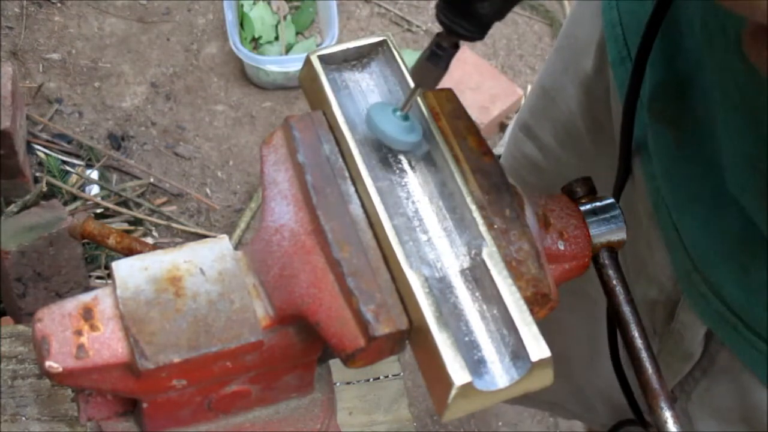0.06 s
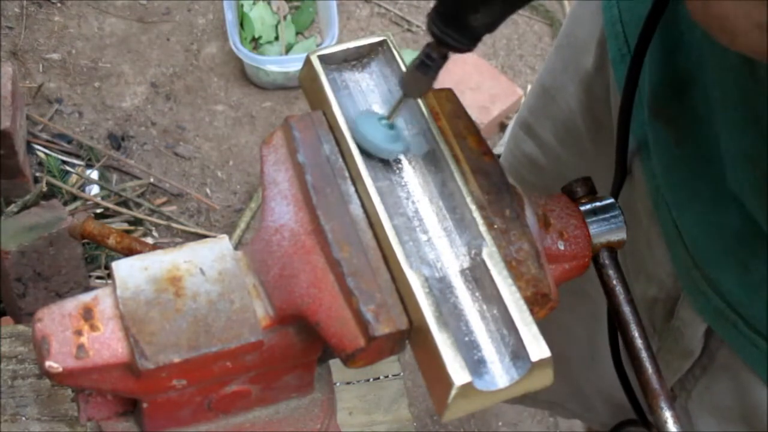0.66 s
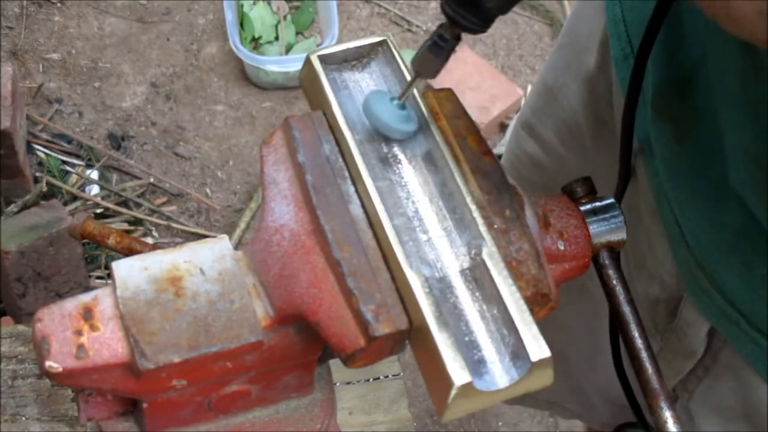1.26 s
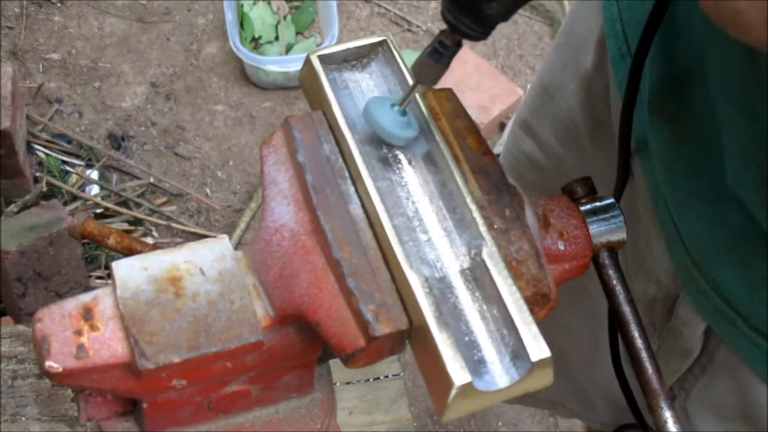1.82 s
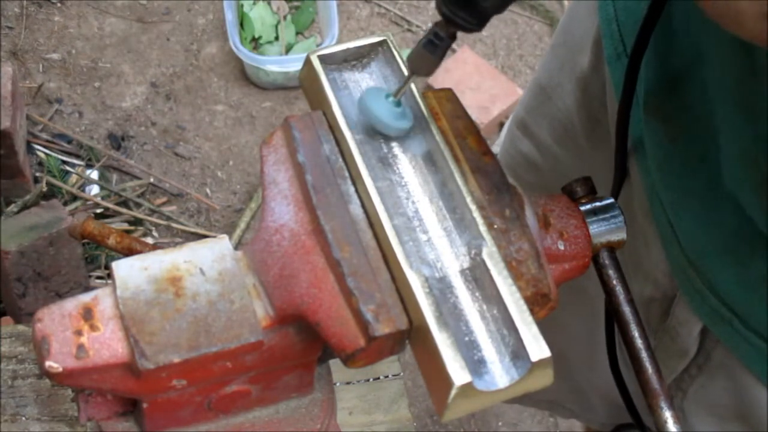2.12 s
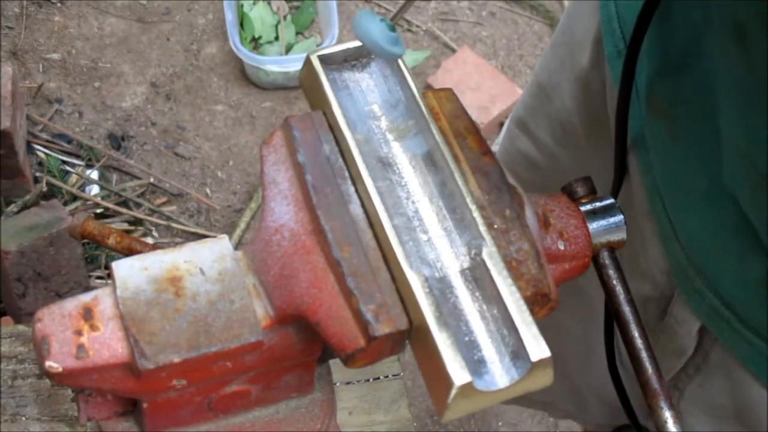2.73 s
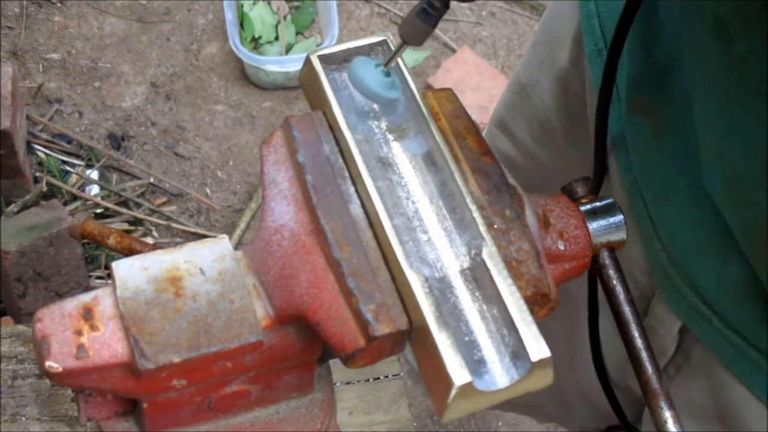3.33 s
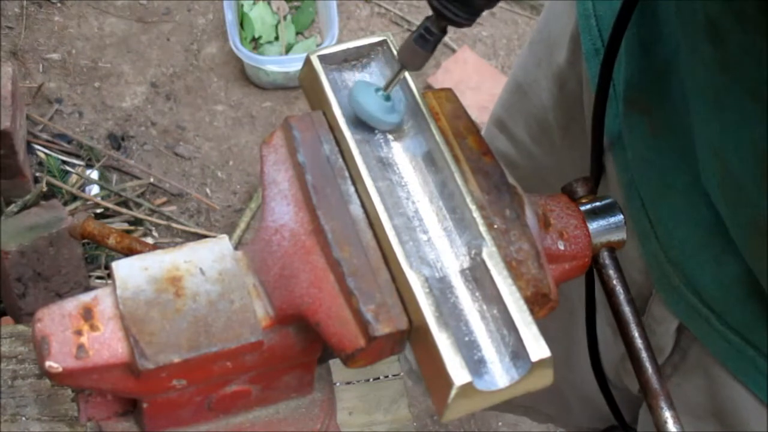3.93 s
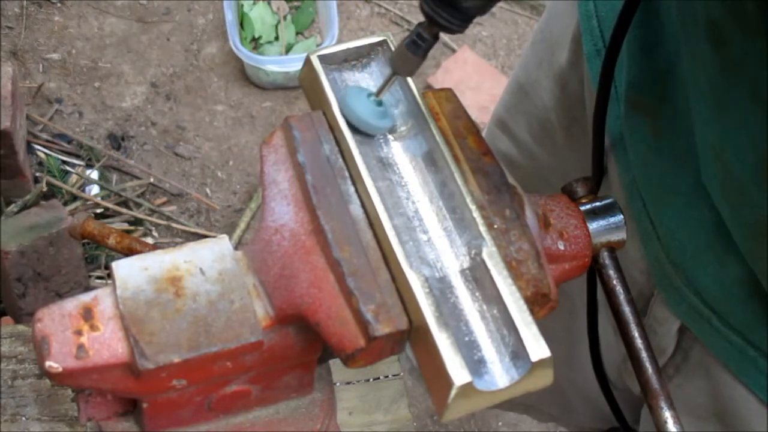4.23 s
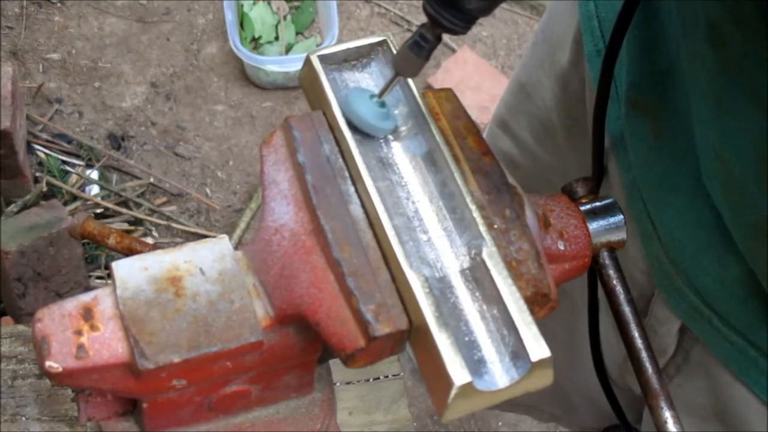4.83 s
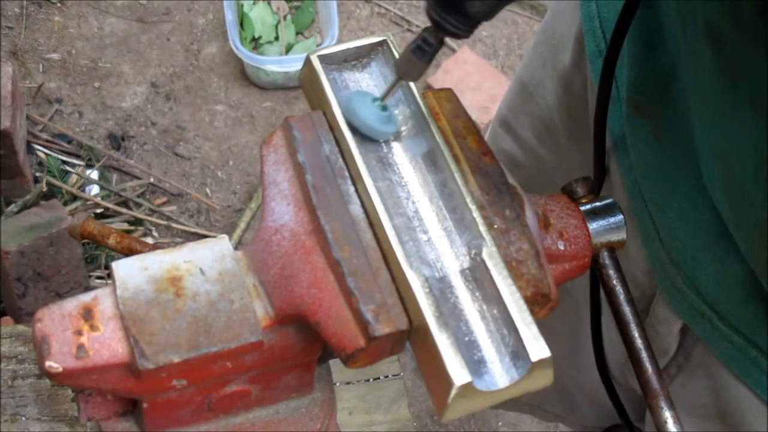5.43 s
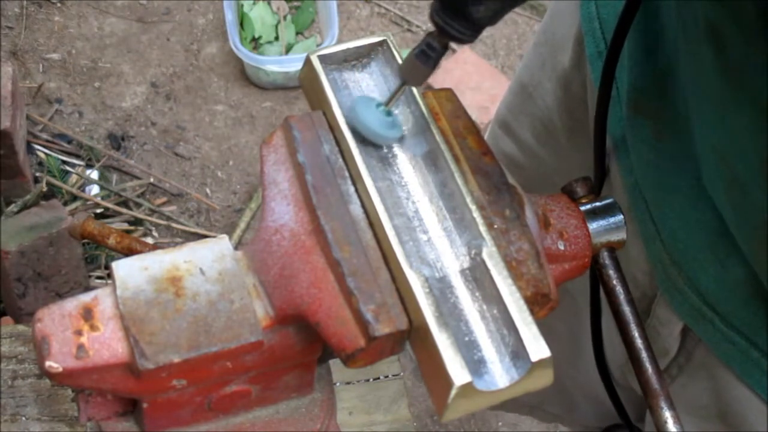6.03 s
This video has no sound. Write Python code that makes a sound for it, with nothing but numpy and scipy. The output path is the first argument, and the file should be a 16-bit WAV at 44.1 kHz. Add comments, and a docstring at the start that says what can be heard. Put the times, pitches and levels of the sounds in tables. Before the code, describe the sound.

A handheld rotary tool runs throughout, close by and outdoors, with a high motor whine and the hiss of its cooling air. After a brief scrape at the very start, its small abrasive wheel bites into a metal casting held in a vise at about 0.5 seconds. It rasps and chatters in short strokes, with a thin sizzle, a metallic ring and sharp snags, while the pitch of the motor sags slightly. At about 2.2 seconds the wheel lifts and the tool runs free, its whine climbing and its hiss growing louder toward 4 seconds. A sharp catch at 3.8 seconds begins the second spell of grinding. From about 4.1 seconds the strokes are harder, dotted with clicks and brief shrill squeals as the wheel skids. The motor drops steadily in pitch under the load, and the grinding continues to the end at about 6 seconds.

```python
"""Outdoors, a handheld rotary tool works a small abrasive wheel over a metal casting clamped in a vise.
Its fan and brushes hiss, and magnetic forces, pulsed at twice the mains frequency, make its housing whine.
The shaft slows under load and recovers when the wheel is lifted. The wheel chatters on the metal:
friction excites the casting's modes, so it rasps and rings, with squealing skids and sharp snags."""
import sys
import numpy as np
from scipy import signal
from scipy.fft import rfft, irfft, next_fast_len
from scipy.io import wavfile
from scipy.ndimage import uniform_filter1d, map_coordinates

SR = 44100
rng = np.random.default_rng(int(sys.argv[2]) if len(sys.argv) > 2 else 0)


def transcribe(signal):
    """Save signal, clipped to [-1, 1], as a 16-bit WAV file at the path in sys.argv[1]."""
    frames = np.atleast_2d(signal).T
    limited = np.clip(frames, -1, 1)
    pcm = np.round(limited * 32767).astype(np.int16)
    wavfile.write(sys.argv[1], SR, pcm)


N = 267687
TIME = np.arange(N) / SR
SPURT_HZ = 119.95  # one spurt of current per mains half-wave
PRESS_S, EASE_S = 0.011, 0.016  # rise and decay of the hand's pressure


def amp(db):
    """Amplitude ratio of a level in decibels."""
    return 10 ** (np.asarray(db) / 20)

def unit(x):
    """Normalisation to rms 1."""
    return x / np.sqrt(np.mean(x ** 2) + 1e-20)

def even(x, size):
    """Normalisation by the running rms over about size samples."""
    power = uniform_filter1d(uniform_filter1d(x ** 2, size), size // 2)
    return x / np.sqrt(np.abs(power) + 1e-12)

def curve(rows):
    """Linear interpolation of (time, value) rows at every sample."""
    return np.interp(TIME, *np.transpose(rows))

def wobble(rate):
    """Smooth random modulation: a spline through rate knots a second."""
    return map_coordinates(rng.standard_normal(int(N * rate / SR) + 4), [TIME * rate])

def swell(start, length, rise, decay, lean_db=0):
    """Envelope: linear attack, a hold that climbs by lean_db, exponential release."""
    age = TIME - start
    hold = amp(lean_db * (np.clip(age / length, 0, 1) + 0.5))
    return np.clip(age / rise, 0, 1) * hold * np.exp(-np.maximum(age - length, 0) / decay)

def body(spectrum, modes=(), size=4096):
    """Minimum-phase impulse response of energy 1: resonance peaks on a broad spectrum."""
    hz = np.fft.rfftfreq(size, 1 / SR)
    knots_hz, level = np.transpose(spectrum)
    broad_db = np.interp(np.log(hz + 1), np.log(knots_hz), level)
    peaks_db = sum(lift / (1 + (2 * (hz - centre) / width) ** 2) for centre, width, lift in modes)
    cepstrum = irfft(np.log(amp(broad_db + peaks_db)))
    cepstrum[1:size // 2] *= 2  # folding makes the response causal
    cepstrum[size // 2 + 1:] = 0
    response = irfft(np.exp(rfft(cepstrum)))
    return response / np.linalg.norm(response)

def through(x, response):
    """Linear filtering: convolution with an impulse response."""
    return signal.fftconvolve(x, response)[:N]


def current(firing=0.5, duty=0.37, rise=0.14):
    """Phase control: the current fires late in each mains half-wave, then falls to zero."""
    age = (TIME * SPURT_HZ - firing) % 1
    return np.clip(age / rise, 0, 1) * np.clip(1 - age / duty, 0, 1)


def eddies(size=512, patchy_db=2.1):
    """Turbulence: noise of rms 1 in which narrow bands swell and fade."""
    spectra = signal.stft(rng.standard_normal(N), nperseg=size)[2]
    patches = uniform_filter1d(rng.standard_normal(spectra.shape), size=4, axis=0)
    patches = uniform_filter1d(patches, size=30, axis=1)
    return unit(signal.istft(spectra * amp(patchy_db * unit(patches)), nperseg=size)[1][:N])


# Cooling air, loudest when the tool runs free: (time [s], level [dB])
AIR_LEVEL = [(0, -33), (.6, -31.5), (.78, -34.5), (1.5, -34.5), (2.1, -31), (2.22, -32.5), (2.4, -30),
             (2.55, -31), (2.82, -28.5), (3.7, -25), (4.02, -25), (4.3, -31), (5.2, -32.5), (6.07, -33.5)]
def following(usual_db, slope, light_load_db=-32):
    """Power law: a level that moves slope dB for each dB of the cooling air."""
    return usual_db + slope * (curve(AIR_LEVEL) - light_load_db)


# Spectra of the vent hiss and the rumble: (frequency [Hz], level [dB])
VENT_SPECTRUM = [(30, -20), (200, -5.5), (400, -9.5), (600, -4), (1500, 3.5), (2200, 1), (2750, -3),
                 (3300, -4.5), (4200, 2), (6500, -0.5), (8200, 4), (10500, -2), (13000, -0.5), (15000, -6),
                 (15800, -22)]
RUMBLE_SPECTRUM = [(20, -69), (40, -34), (58, 0.5), (80, -19), (110, -6), (180, -25), (400, -27),
                   (2000, -79)]
# Resonances of vents and brushes: (frequency [Hz], bandwidth [Hz], lift [dB])
VENT_MODES = [(1025, 190, 7.4), (3730, 210, 5.1), (5990, 590, 4.2), (8760, 130, 3.4), (9380, 200, 4),
              (11000, 550, 4.6), (15400, 600, 3.6)]
BRUSH_PEAK = [(12600, 3400, 14)]
# Bands of brush hiss that stand out as the tool is turned:
# (time [s], duration [s], frequency [Hz], half-width [Hz], level [dB])
BRUSH_BANDS = [(2.331, .42, 15500, 705.5, -45), (2.718, .65, 9490, 450, -46), (2.92, 0.28, 11800, 551, -36),
               (3.172, .92, 13200, 748, -38), (3.548, 0.46, 8950, 399.5, -39)]
def fan_and_brushes(turns, swirl_db=3.0, flutter_db=1.23, spark_db=4, rumble_db=-24):
    """Amplitude-modulated noise: air pulses once a turn over a rumble, brushes once a current spurt."""
    swirl = amp(swirl_db * np.cos(2 * np.pi * turns) + flutter_db * wobble(70))
    hiss = through(swirl * eddies(), body(VENT_SPECTRUM, VENT_MODES))
    sparks = unit(amp(spark_db * current()))
    brush_noise = through(eddies(), body([(3000, -19), (11000, 0)], BRUSH_PEAK))
    brushes = amp(following(usual_db=-42.5, slope=1)) * brush_noise
    for start, length, hz, half_width, db in BRUSH_BANDS:
        band = through(rng.standard_normal(N), body([(10000, 0)], [(hz, 2 * half_width, 30)]))
        brushes += amp(db) * swell(start, length, rise=0.043, decay=0.043) * band
    rumble = through(rng.standard_normal(N), body(RUMBLE_SPECTRUM))
    return amp(curve(AIR_LEVEL)) * (hiss + amp(rumble_db) * rumble) + sparks * brushes


# Reflection off the vise, shifting as the hand moves the tool: (time [s], delay [ms])
VISE_DELAY = [(0, 0.42), (.7, 0.28), (1.3, 0.44), (2.15, 0.42), (2.35, 0.33), (2.9, 0.307), (3.1, 0.31),
              (6.07, 0.32)]
def reflected(x, share=0.27):
    """Comb filtering: the direct sound interferes with its delayed reflection."""
    lag = curve(VISE_DELAY) * SR / 1000
    return x + share * map_coordinates(x, [np.arange(N) - lag])


# Response of the housing: (frequency [Hz], level [dB])
HOUSING_SPECTRUM = [(1000, -53), (1500, -37.5), (1750, -5.5), (2000, -13.5), (2150, 2), (2300, 9.5),
                    (2440, 16.5), (2560, 9.5), (2800, -48), (4000, -54.5)]
# Its resonance: (frequency [Hz], bandwidth [Hz], lift [dB])
HOUSING_PEAK = [(1870, 125, 8)]
# Commutator whistle: (time [s], level [dB])
WHISTLE_LEVEL = [(0, -36), (.6, -36), (.7, -38), (1, -39.5), (1.6, -40), (1.8, -47), (2.15, -44),
                 (2.35, -36.5), (3.45, -34.5), (3.8, -40), (4.6, -44), (4.9, -54)]
# Tones of the unloaded shaft: (multiple of the shaft speed, level re the air [dB])
SHAFT_TONES = [(1, -16), (2, -30), (7, -32), (12, -18), (14, -26), (15, -44), (16, -15.5), (24, -15)]
# Buzz of the windings: (multiple of the spurt rate, level re the air [dB])
WINDING_TONES = [(1, -26.5), (3, -29.5), (4, -27.5), (5, -24.5), (6, -25), (7, -40)]
def motor(turns, speed, easy_hz=245, sag_hz=11, damped_db=-5, rough_db=1.3):
    """Forced vibration: eight slots pull on the housing; load damps the shaft tones and adds strain."""
    load = np.clip((easy_hz - speed) / sag_hz, 0, 1)
    angle = 2 * np.pi * turns
    field = current() + 0.081 + 0.015 * load  # a little pull remains between spurts
    pull = np.sin(8 * angle) * field * amp(rough_db * wobble(120))
    housing = even(through(pull, body(HOUSING_SPECTRUM, HOUSING_PEAK)), size=2940) / np.sqrt(2)
    whine = amp(following(usual_db=-28, slope=1.56)) * housing
    strain = load * amp(-44 + 2.7 * wobble(33)) * np.sin(16 * angle)
    whistle = amp(curve(WHISTLE_LEVEL) + 0.8 * wobble(30)) * np.sin(18 * angle)
    shaft = sum(amp(db + 1.5 * wobble(15)) * np.sin(k * angle) for k, db in SHAFT_TONES)
    spurt_angle = 2 * np.pi * SPURT_HZ * TIME
    buzz = sum(amp(db + 0.83 * wobble(5.16)) * np.sin(k * spurt_angle) for k, db in WINDING_TONES)
    return whine + strain + whistle + amp(curve(AIR_LEVEL)) * (amp(damped_db * load) * shaft + buzz)


# Spells of smooth riding: (time [s], duration [s], level [dB])
SMOOTH_RIDES = [(1.95, .19, -35), (4.88, .12, -37)]
# Their tones: (multiple of the shaft speed, relative level [dB])
HUM_TONES = [(5, 0), (6, -8), (19, -6), (21, -10)]
def hums(turns):
    """Periodic forcing: riding on its high spot, the wheel makes the casting sing at shaft harmonics."""
    level = sum(amp(db) * swell(start, length, PRESS_S, EASE_S) for start, length, db in SMOOTH_RIDES)
    tones = sum(amp(db + 3.7 * wobble(25.64)) * np.sin(2 * np.pi * k * turns) for k, db in HUM_TONES)
    return level * tones


# Squeal, moving with the contact spot and the pressure: (time [s], frequency [Hz])
SQUEAL_PITCH = [(.75, 9310), (1.45, 9770), (2.1, 9270), (3.85, 8820), (4.25, 9750), (5.5, 9860),
                (6.07, 9465)]
def squeal(spread_hz=240):
    """Friction-induced vibration: a shrill tone of rms 1, roughened by random frequency modulation."""
    pitch = curve(SQUEAL_PITCH) + spread_hz * wobble(1200)
    return unit(np.sin(2 * np.pi * np.cumsum(pitch) / SR))


# Sizzle of the contact: (frequency [Hz], level [dB])
SIZZLE_SPECTRUM = [(1000, -24.5), (3000, -28), (6500, -13), (8000, -6), (8500, -3.5), (10100, -5.5),
                   (10700, -11), (13500, -11.5), (15800, -53)]
# Its resonances: (frequency [Hz], bandwidth [Hz], lift [dB])
CONTACT_MODES = [(8480, 180, 6), (8900, 260, 9), (9520, 160, 7), (9830, 330, 10), (10800, 170, 5),
                 (12000, 150, 4)]
def chirp(level, noise_db=-2):
    """Sliding friction: the slipping wheel's squeal, wrapped in sizzle."""
    tone = level * squeal()
    sizzle = through(level * rng.standard_normal(N), body(SIZZLE_SPECTRUM, CONTACT_MODES))
    return tone + amp(noise_db) * sizzle


# Sideways slips, mostly where a stroke turns round: (time [s], duration [s], level [dB])
SLIPS = [(1.688, 0.015, -21.5), (4.241, .015, -20), (4.575, .04, -26), (4.678, 0.012, -21.5),
         (4.968, 0.049, -24.5), (5.177, 0.008, -25), (5.282, 0.03, -24.5), (5.471, 0.038, -23.5),
         (5.549, 0.027, -26), (5.827, 0.011, -23.5), (0.74, 0.0078, -17)]
def skids(turns, depth_db=8, peak_turn=0.33):
    """Modulation by rotation: the skidding wheel chirps once every turn."""
    level = np.zeros(N)
    for start, length, db in SLIPS:
        turned = turns - np.interp(start, TIME, turns)
        pulses = unit(amp(depth_db * np.cos(2 * np.pi * (turned - peak_turn))))
        level += amp(db) * swell(start, length, rise=0.0011, decay=0.0054) * pulses
    return chirp(level)


# Bouncing of the wheel, faster when pressed hard: (time [s], landing rate [Hz])
HOP_RATE = [(.8, 68), (1.4, 72), (1.8, 60), (4.2, 100), (5.1, 78), (5.3, 105), (5.7, 76)]
def chatter(turns, jitter_s=0.0007, scatter_db=0.8, hop_db=6.5, turn_db=-4):
    """Impact train: the wheel bites on each current spurt, hardest on landing, and lightly once a turn."""
    spurts = np.arange(1, int(TIME[-1] * SPURT_HZ) - 1)
    timing, force, bounce = rng.standard_normal((len(spurts), 3)).T
    onsets = (((spurts + 0.6) / SPURT_HZ + jitter_s * timing) * SR).astype(int)
    hops = np.cumsum(np.exp(0.07 * bounce) * curve(HOP_RATE)[onsets] / SPURT_HZ)
    lands = np.diff(np.floor(hops), prepend=0) > 0
    depth = np.tanh(force)  # the springy wheel limits how deep a bite goes
    bites = np.bincount(onsets, amp(scatter_db * depth + hop_db * lands), N)
    high_spot = amp(turn_db) * np.diff(np.floor(turns), prepend=0)
    t = TIME[:SR // 20]
    rise_s, decay_s = 0.0006, 0.0024
    return through(bites + high_spot, np.exp(-t / decay_s) * (1 - np.exp(-t / rise_s)))


# Light touches and pressed strokes: (time [s], duration [s], rasp level [dB], sizzle level [dB])
LIGHT_TOUCHES = [(.795, 1.358, -38, -34), (4.1, 1.97, -31.5, -31)]
PRESSED_STROKES = [(-.02, 0.055, -30, -38), (.478, 0.018, -33.5, -33), (.58, 0.13, -28, -35),
                   (.795, 0.331, -30.5, -41), (1.15, 0.13, -28.5, -50), (1.305, 0.067, -27.5, -49),
                   (1.475, 0.23, -29, -41), (1.78, 0.099, -31, -36), (1.905, 0.074, -26, -44),
                   (2.08, 0.07, -33, -36), (3.825, 0.15, -34.5, -33), (3.99, 0.1, -29, -31.5),
                   (4.1, 0.12, -23.5, -33), (4.355, 0.22, -25.5, -34), (4.685, 0.1567, -24, -32.5),
                   (5.005, 0.19, -25.5, -36), (5.24, 0.08, -29.5, -27), (5.32, 0.16, -24.5, -38),
                   (5.595, 0.16, -26.5, -40), (5.745, 0.053, -25, -31), (5.89, 0.11, -24.5, -47)]
def contact(tremor_db=0.7):
    """Incoherent addition: touches and strokes sum in power to rasp and sizzle gains; the hand trembles."""
    rasp, sizzle = np.zeros((2, N))
    for start, length, rasp_db, sizzle_db in [*LIGHT_TOUCHES, *PRESSED_STROKES]:
        pressure = swell(start, length, PRESS_S, EASE_S, lean_db=1)
        rasp += (amp(rasp_db) * pressure) ** 2
        sizzle += (amp(sizzle_db) * pressure) ** 2
    return np.sqrt([rasp, sizzle]) * amp(tremor_db * wobble(30))


def grit(spread_db):
    """Roughness noise of rms 1: scratches of unequal size."""
    return unit(rng.standard_normal(N) * amp(spread_db * rng.standard_normal(N)))


def wheel_face(turns, wear_hz=14, grits=160):
    """Repetition pitch: the same grits pass every turn, changing slowly as the wheel wears."""
    face = rng.standard_normal((int(N * wear_hz / SR) + 4, grits))
    return unit(map_coordinates(face, [TIME * wear_hz, turns % 1 * grits], mode="grid-wrap"))


# Spectra of the rasping casting and the shaking vise: (frequency [Hz], level [dB])
RASP_SPECTRUM = [(40, -25), (130, -36), (260, -14.5), (550, -8.5), (750, 0), (1050, 2), (1450, 0.5),
                 (1650, -7), (2100, 0), (2800, -9), (5000, -13), (8000, -11.5), (12000, -11.5),
                 (15800, -23)]
VISE_SPECTRUM = [(30, -22), (85, -12), (115, -2), (150, -3), (195, -15), (300, -11), (390, -5), (450, -16),
                 (1500, -70)]
# Resonances of the casting: (frequency [Hz], bandwidth [Hz], lift [dB])
METAL_MODES = [(1350, 50, 5), (1845, 60, 4), (3720, 230, 9.5), (3960, 110, 8), (4270, 110, 4),
               (4570, 90, 6), (5090, 45, 9), (5255, 60, 12), (5608, 70, 11.5), (6450, 110, 6),
               (7380, 200, 9), (7770, 60, 9), (8330, 80, 8)]
def grinding(turns, rasp_level, sizzle_level, squeal_db=-5, shake_db=-23):
    """Abrasion: under the contact force the casting rasps, the grit sizzles and squeals, the vise shakes."""
    push = chatter(turns)
    # the treble needs a hard bite and a moment to build, so it grows faster than the force
    slip = np.abs(uniform_filter1d(push, size=100)) ** 1.7
    scrape = even(push * (0.55 * wheel_face(turns) + grit(spread_db=1)), size=2600)
    scratch = even(slip * grit(spread_db=1.5), size=2600)
    rasp = through(scrape * rasp_level, body(RASP_SPECTRUM, METAL_MODES))
    sizzle = through(scratch * sizzle_level, body(SIZZLE_SPECTRUM, CONTACT_MODES))
    shrill = even(slip * squeal(), size=2600) * sizzle_level
    shake = through(rng.standard_normal(N) * rasp_level, body(VISE_SPECTRUM))
    return rasp + sizzle + amp(squeal_db) * shrill + amp(shake_db) * shake


# Hard catches of the wheel: (time [s], knock level [dB], scrape level [dB], relative chirp level [dB])
CATCHES = [(0.5956, -33, -31, -23), (0.6113, -31, -35, -24), (0.6381, -29, -37, -22),
           (0.6777, -23, -29, -18), (0.698, -18.5, -19.5, -13), (0.702, -26, -24, -13.5),
           (0.8329, -24, -30, -20.5), (0.88, -28, -36, -17), (0.8972, -27, -32, -20),
           (1.039, -26, -38, -22), (1.1666, -29, -39, -24), (1.1897, -28, -20, -20),
           (1.2226, -27, -28, -16.5), (1.2397, -33, -32, -28), (1.2651, -26, -39, -34),
           (1.3228, -22, -25, -32), (1.348, -25, -30, -33), (1.3653, -24, -34, -29),
           (1.5721, -24, -26, -25), (1.6325, -20.5, -21, -20), (1.7493, -29, -24, -19.5),
           (1.781, -25, -21.5, -23), (1.8153, -37, -29, -18), (1.8729, -31, -23.5, -21),
           (1.9393, -23, -22, -18), (1.9566, -18, -24, -17), (1.972, -33, -27, -22),
           (1.9889, -31, -23, -19), (3.824, -18, -16.5, -18), (4.0194, -24, -23, -17.5),
           (4.1112, -23, -21, -15.5), (4.1408, -28, -26, -18), (4.183, -23, -20, -22),
           (4.194, -21, -21, -22), (4.2174, -25, -22, -16), (4.2331, -25, -28, -13),
           (4.3707, -35, -29, -16), (4.5631, -33, -25.5, -15.5), (4.667, -27, -24.5, -11),
           (4.7169, -19, -25, -25), (4.758, -22, -27, -29), (4.8263, -17.5, -26, -21),
           (4.8328, -29, -21, -18), (5.0666, -19, -22, -25), (5.085, -22, -21, -19),
           (5.1741, -30, -32, -19), (5.4253, -25, -29, -21), (5.4591, -26, -27, -17),
           (5.6, -30, -29, -17.5), (5.7081, -23, -28, -29), (5.75, -23, -23, -16),
           (5.7588, -20.5, -29.5, -20.5), (5.7674, -21, -21, -29), (5.7919, -33, -32, -17),
           (5.8599, -23, -26, -17), (5.8767, -20, -26, -17), (5.9605, -18, -21, -20),
           (5.9742, -15.5, -16.5, -17)]
# Spectra of a catch: (frequency [Hz], level [dB])
KNOCK_SPECTRUM = [(100, -32), (500, -12.5), (900, 3), (2100, 0), (2900, -23.5), (15800, -38)]
SCRAPE_SPECTRUM = [(600, -20), (2500, 0), (7000, 0), (10000, -7), (13000, -7), (15800, -12)]
def snags(crack_s=0.0003, tear_s=0.0029, span_s=0.005, chirp_gain_db=-1):
    """Impulsive excitation: a catch cracks and tears at the metal while a chirp swells and dies."""
    t = TIME[:SR // 40]
    envelope = np.exp(-t / tear_s) + 1.5 * np.exp(-t / crack_s)
    arch = np.sin(np.pi * np.minimum(t / span_s, 1))
    knock, scrape, slip = np.zeros((3, N))
    for start, knock_db, scrape_db, chirp_db in CATCHES:
        tear = envelope * rng.standard_normal((2, len(t)))
        tear *= np.sqrt(span_s * SR) / np.linalg.norm(tear, axis=1, keepdims=True)
        during = round(start * SR) + np.arange(len(t))
        knock[during] += amp(knock_db) * tear[0]
        scrape[during] += amp(scrape_db) * tear[1]
        slip[during] += amp(chirp_db) * arch
    knocks = through(knock, body(KNOCK_SPECTRUM, METAL_MODES))
    scrapes = through(scrape, body(SCRAPE_SPECTRUM, METAL_MODES))
    return knocks + scrapes + amp(chirp_gain_db) * chirp(slip)


# Shaft speed, sagging on the metal and recovering when lifted: (time [s], rotation rate [Hz])
SHAFT_SPEED = [(0, 246.4), (.35, 252.3), (.6, 254.3), (.76, 248.7), (1.05, 244.2), (1.2, 243.1),
               (1.36, 237.7), (1.75, 234.9), (2.09, 232.8), (2.43, 244.5), (2.8, 251.5), (3.25, 254.9),
               (3.75, 257.6), (4.14, 256.2), (4.31, 249.5), (4.6, 242.6), (4.75, 240.6), (4.9, 236.9),
               (5.2, 232.8), (5.36, 228), (6.07, 226.8)]
def scene():
    """Superposition: one shaft drives fan, motor and wheel, less evenly as it slows and the wheel drags."""
    speed = curve(SHAFT_SPEED)
    rasp_level, sizzle_level = contact()
    unsteady_hz = np.interp(speed, [229, 234, 250], [2.8, 0.8, 0.1]) + 12 * rasp_level
    turns = np.cumsum(speed + unsteady_hz * wobble(50)) / SR
    wheel = grinding(turns, rasp_level, sizzle_level) + hums(turns) + skids(turns) + snags()
    return (motor(turns, speed) + reflected(fan_and_brushes(turns)) + wheel)[None]


def record(dry, ceiling=0.95, top_hz=15800):
    """Soft saturation rounds the highest peaks; a low-pass filter limits the band."""
    rounded = dry / (1 + np.abs(dry / ceiling) ** 6) ** (1 / 6)
    size = next_fast_len(N + SR // 2)
    passband = np.fft.rfftfreq(size, 1 / SR) < top_hz
    return irfft(rfft(rounded, size) * passband, size)[..., :N]


dry = scene()
out = record(dry)
transcribe(out)
```